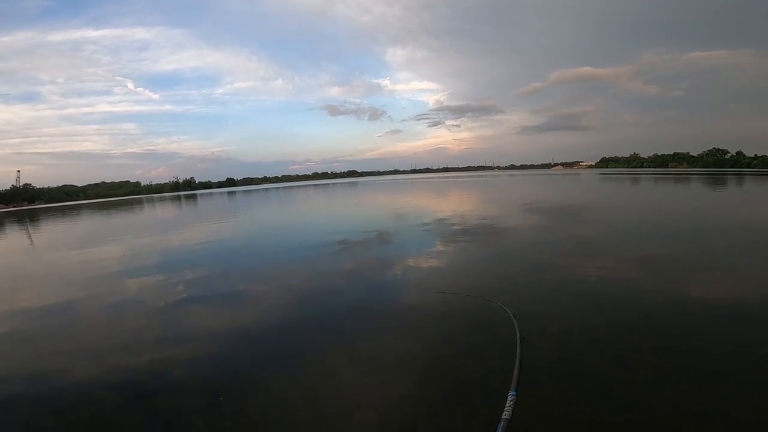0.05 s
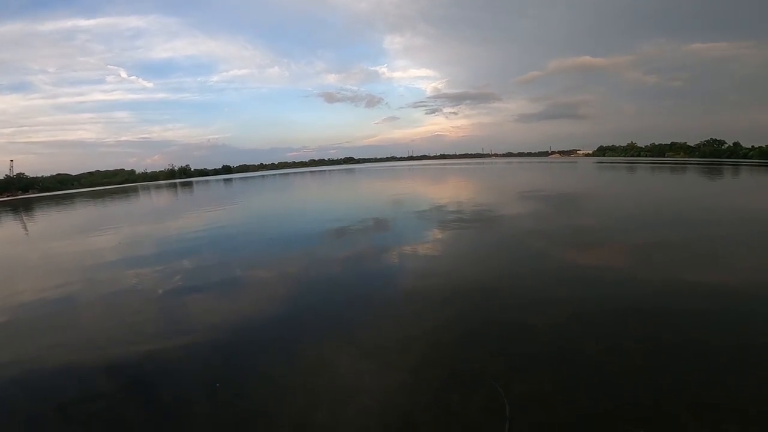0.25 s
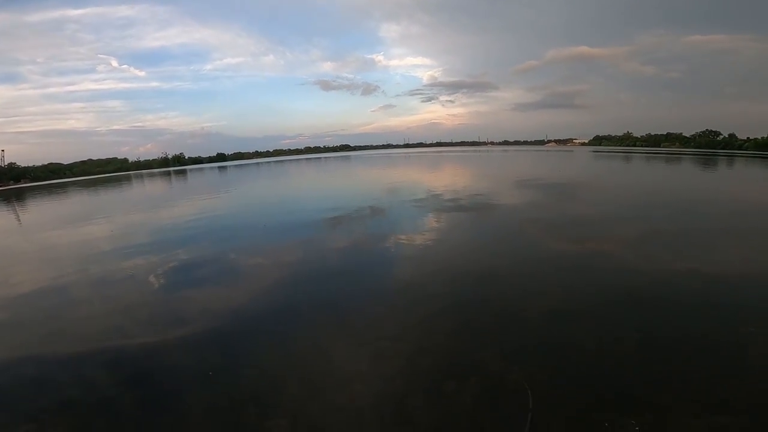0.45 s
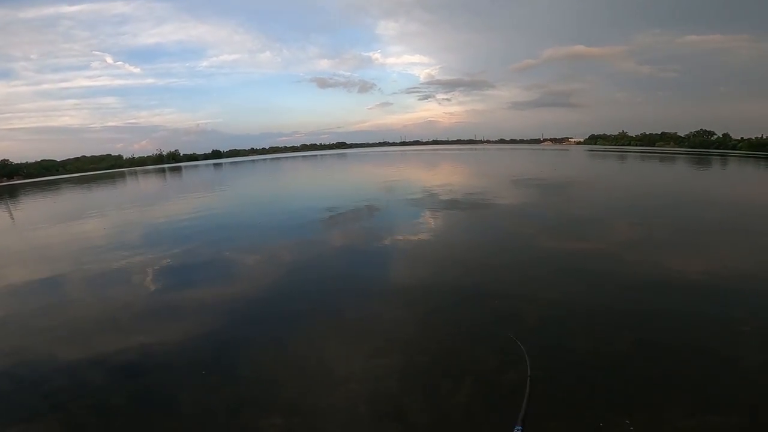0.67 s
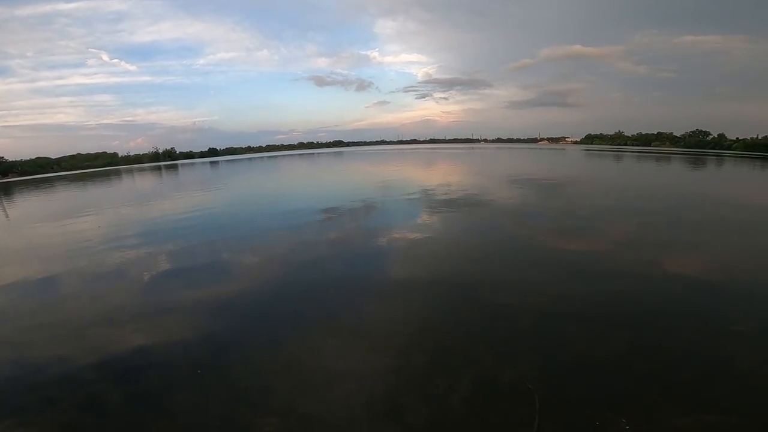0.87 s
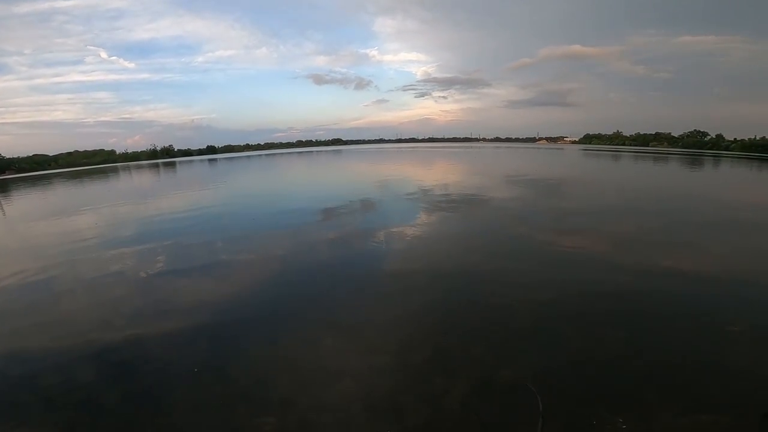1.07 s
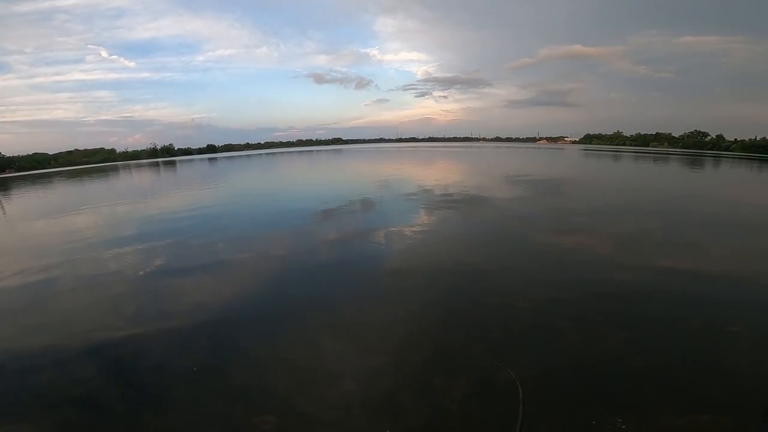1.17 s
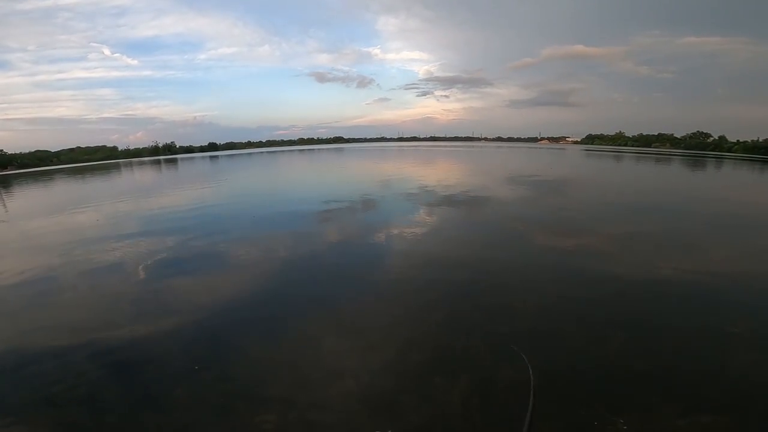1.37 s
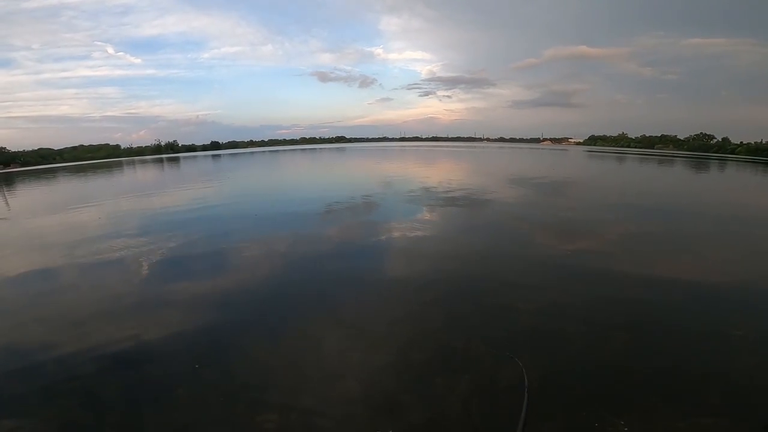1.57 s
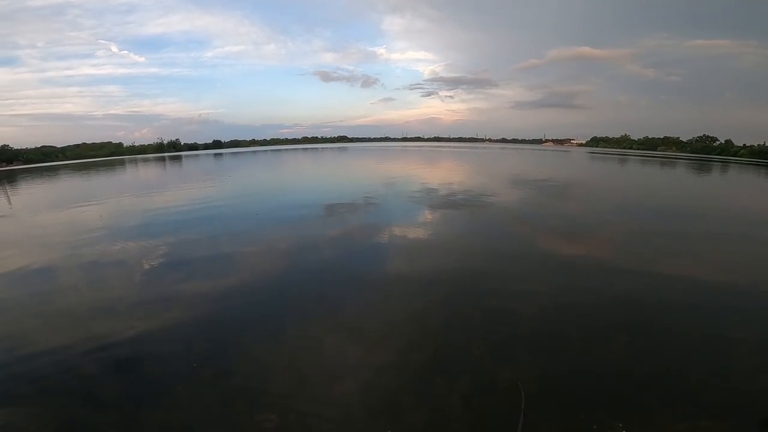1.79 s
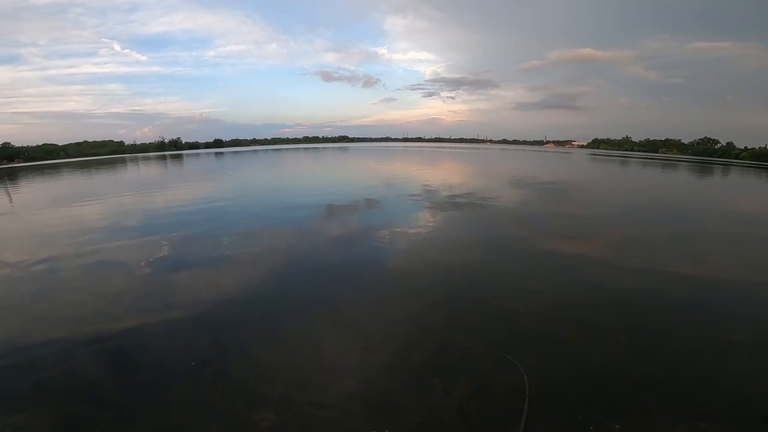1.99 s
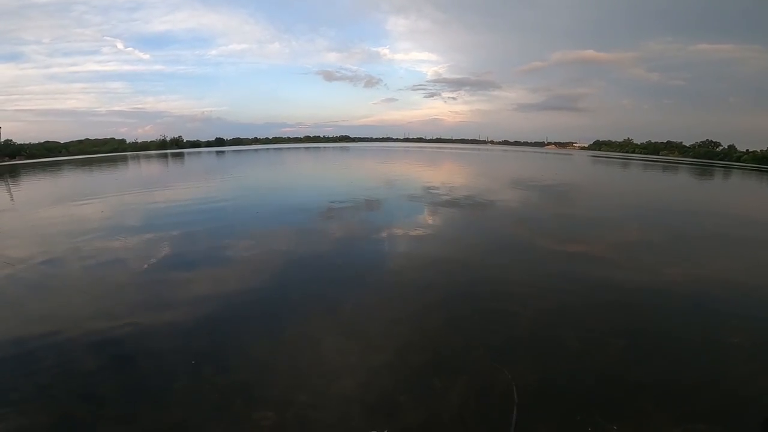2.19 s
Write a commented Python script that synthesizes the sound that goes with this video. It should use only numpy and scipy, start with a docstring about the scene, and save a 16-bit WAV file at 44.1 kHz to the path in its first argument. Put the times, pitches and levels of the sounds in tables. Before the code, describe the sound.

A fishing reel cranked close by, five dry knocks over uneven whirring, two dull bumps, faint splashes

```python
"""Fishing reel by a lake

A spinning reel is cranked against a hooked fish, close to a body-worn camera on a calm lake shore.
The gears whirr up and down with the handle: wavering tones plus rasping noise. Short pulses make five knocks.
Filtered pulses and fading noise make two soft bumps on the camera.
Small rising tones and noise make faint splashes, over a rumble of low noise."""
import sys
import numpy as np
from scipy import signal
from scipy.fft import rfft, irfft, next_fast_len
from scipy.io import wavfile
from scipy.ndimage import uniform_filter1d, map_coordinates

SR = 44100
rng = np.random.default_rng(int(sys.argv[2]) if len(sys.argv) > 2 else 0)


def log_audio(samples):
    """Write samples as a 16-bit WAV file to the path given in sys.argv[1]."""
    # one column per channel
    frames = np.atleast_2d(samples).T
    # limit to full scale, then quantise
    limited = np.clip(frames, -1, 1)
    pcm = np.round(limited * 32767).astype(np.int16)
    wavfile.write(sys.argv[1], SR, pcm)


N = 98607

# Every ..._COLOUR table is the tone colour of a sound: frequency_hz, level_db
# Tooth rate of the gears, slow and fast with each push on the handle: start_s, tooth_rate_hz
CRANK = [(0, 4900), (.025, 2400), (.075, 1600), (.115, 2350), (.155, 1950), (.198, 2950), (.225, 2350),
         (.275, 1830), (.315, 2750), (.337, 4900), (.352, 2600), (.373, 3600), (.392, 2300), (.465, 1630),
         (.508, 2950), (.54, 1600), (.575, 2150), (.625, 5400), (.648, 2400), (.715, 3350), (.765, 1650),
         (.8, 2750), (.822, 1850), (.885, 3300), (.915, 4750), (.945, 1600), (1.025, 3200), (1.055, 2750),
         (1.085, 1850), (1.16, 1550), (1.215, 2500), (1.26, 5500), (1.285, 2000), (1.32, 2200),
         (1.35, 3250), (1.385, 3200), (1.42, 1850), (1.505, 2080), (1.545, 2950), (1.583, 4450),
         (1.607, 1650), (1.682, 3300), (1.75, 1200), (1.79, 3050), (1.815, 1650), (1.862, 3000),
         (1.91, 3400), (1.937, 1700), (1.995, 2500), (2.045, 1680), (2.113, 2600), (2.152, 1500),
         (2.21, 2200), (2.236, 3400)]
# Tones of the whine: multiple (of an eighth of the tooth rate), level_db
GEAR_TONES = [(2, -10), (4, -5), (5, -8), (6, -4), (7, -12), (8, 0), (9.5, -11), (12, -13), (14, -15)]
# How strongly the reel housing passes each pitch of the whine: frequency_hz, level_db
HOUSING = [(400, -2.5), (1500, -2), (2400, 3.5), (3200, 1.5), (3800, 2), (4500, 1.5), (5200, 1.5),
           (6000, -4), (9000, -18), (15000, -48)]
# Loudness of the gears under the pull of the fish: start_s, level_db
LOAD = [(0, -42), (.45, -42.5), (.83, -40.5), (1.32, -39), (1.45, -41.5), (2.23, -37.5)]
RASP_COLOUR = [(200, -16.5), (600, -3), (1100, -1), (1600, 2.5), (2400, 0), (3100, -2), (4450, -4.5),
               (4900, -0.5), (5400, -10.5), (6200, -17), (9000, -36), (15000, -50)]
# Loudness of the high hiss: start_s, level_db
SPRAY = [(0, -59), (.2, -66.5), (.45, -67.5), (.6, -55.5), (.78, -58.5), (.87, -48.5), (1.1, -60),
         (1.33, -54), (1.48, -70), (1.65, -67), (1.851, -55), (2.1, -62), (2.23, -57)]
SPRAY_COLOUR = [(3000, 4.5), (6000, 11.5), (7500, 7), (10000, -2), (13000, -10.5), (15500, -46)]
# Splashes that swell and fade: middle_s, half_length_s, level_db
SPLASHES = [(.89, 0.018, -43), (.98, 0.052, -40.5), (1.73, 0.014, -39.5), (1.88, 0.062, -44.5),
            (2.05, 0.1, -51.5)]
SPLASH_COLOUR = [(150, 4), (400, -8), (900, -3.5), (1600, -7), (15000, -56)]
# Single plops of water: start_s, pitch_hz, level_db
PLOPS = [(.86, 370, -28), (.96, 655, -39), (.991, 670, -33), (1.008, 403, -31), (1.335, 255, -31),
         (1.738, 910, -31.5), (1.771, 290, -35), (1.795, 1430, -29.5), (1.858, 1090, -32.5),
         (1.875, 920, -27), (1.935, 452, -37), (2.066, 237, -35), (2.166, 920, -25.5)]
RUMBLE_COLOUR = [(15, -3), (32, -1), (60, -6), (120, -6), (190, -5.5), (300, -13.5), (500, -24),
                 (1200, -26.5), (5000, -59), (15000, -93)]
# Slow sways of the camera mount: middle_s, half_length_s, level_db
SWAYS = [(.03, 0.068, -38.5), (.37, 0.021, -34.5), (.67, 0.026, -33.5), (1.6, 0.019, -35)]
SWAY_COLOUR = [(12, 10), (33, -7), (55, 7.5), (120, -56), (1000, -100)]
# Pulses that make up the two bumps on the camera: start_s, level_db, shudder_level_db
BUMPS = [(.394, -21, -29.5), (.405, -13, -36), (0.4103, -7.5, -25.5), (0.468, -36, -28.5),
         (1.126, -44, -23), (1.137, -27, -32), (1.1427, -9, -33), (1.205, -24, -31.5)]
BUMP_COLOUR = [(20, -17.5), (55, -8.5), (85, 1.5), (120, 5.5), (155, -2.5), (200, -3), (255, -7),
               (315, -1.5), (450, -29), (700, -32), (3000, -100)]
SHUDDER_COLOUR = [(25, 2), (120, 1.5), (200, 2.5), (330, -2.5), (500, -9), (750, -20.5), (2000, -86)]
# Knocks of play in the reel: start_s, level_db, brightness_db_per_octave, whine_tail_level_db
KNOCKS = [(.3345, -10, 0, -30), (.622, -11, -.3, -38), (.9129, -10.5, .5, -35), (1.2027, -19.5, -2.5, -55),
          (1.5832, -10, -1, -41)]
KNOCK_COLOUR = [(200, -40), (450, -19), (750, -8), (1500, -.5), (2050, -6.5), (2400, -2.5), (2870, 4),
                (3500, -16), (4100, -11), (5500, -31), (9000, -37), (15000, -66)]
# Light ticks of the line: start_s, level_db
TICKS = [(.3795, -35), (.68, -40), (1.3135, -35), (1.978, -30.5)]
TICK_COLOUR = [(800, 2), (2500, -11), (4000, 12.5), (5300, 1), (6500, -7.5), (12000, -26), (16000, -48)]
# Stereo width of the noises once the image is fully open: frequency_hz, side_over_mid_db
WIDTH = [(100, -35.5), (350, -24.5), (700, -17.5), (2800, -14.5), (5500, -3.5), (10000, -0.5), (14000, 5)]
# Level of the stereo difference over time: start_s, level_db
OPENING = [(0, -33), (.82, -37), (.96, -14.5), (1.85, -0.5)]
# Share of the middle that leans to the left: frequency_hz, level_db
LEAN = [(100, -55), (600, -16), (2000, -30), (3200, -18)]

# A T60 is the time in seconds to fade by 60 dB
MID_SPEED_HZ = 2500  # tooth rate from which octaves of speed are counted
JITTER, FLUTTER_DB = .028, 5  # random wavering in pitch (share) and level
WHINE_DB, WHINE_GROWS_DB = -4, 4  # level over the load, growth per octave of speed
RASP_DB, RASP_GROWS_DB, RASP_GRAIN_DB = -2, 2.5, 2.5  # the same for the rasp, and its roughness
RASP_BRIGHTENS_DB, RASP_TREBLE_HZ = 1, 3700  # extra treble gain per octave of speed
SLACK_DB, SLACK_OCT_PER_S = 10, 120  # the teeth fully unload when slowing this fast
BUBBLE_HZ, BUBBLE_CYCLES, BUBBLE_DB = 698, 2.03, -1.5  # middle pitch, life in cycles, level
CRACKLE_HZ, CRACKLE_CYCLES, CRACKLE_DB = 1100, .8, 1  # the same for the droplets
BUBBLE_SPREAD, BUBBLE_RISE = 0.607, 0.011  # random spread of pitch (log scale), upward bend
WASH_DB, RUMBLE_DB = -3.5, -41
SHUDDER_T60, BUMP_TOP_HZ = 0.38, 1100
SMEAR_HZ, SMEAR_WIDTH_HZ = 2030, 2200  # the rod delays this band of each knock
REBOUND_S, REBOUND_DB = .004, -20  # delay and level after the knock
RATTLE_DB, RATTLE_T60 = -15, 0.025
CLATTER_DB, CLATTER_S = -26, 0.0085  # loose parts chatter just before and after each knock
TAIL_HZ, TAIL_T60 = 4490, 0.05  # high tone that fades after each knock
TICK_T60 = 0.059
TOP_HZ = 15400  # the camera keeps nothing above this


def amp(db):
    """Turn decibels into a gain."""
    return 10 ** (np.asarray(db) / 20)


def unit(x):
    """Scale a sound to an average (rms) strength of 1."""
    return x / np.sqrt(np.mean(x ** 2) + 1e-20)


def clock():
    """Give the time of every sample in seconds."""
    return np.arange(N) / SR


def over_time(points):
    """Join (time, value) points with straight lines."""
    return np.interp(clock(), *np.transpose(points))


def along(points, hz):
    """Join (frequency, value) points on a logarithmic frequency axis."""
    f, v = np.transpose(points)
    return np.interp(np.log(hz + 1), np.log(f + 1), v)


def wobble(rate):
    """Draw a smooth random curve through this many random points a second."""
    knots = rng.standard_normal(int(N * rate / SR) + 4)
    return map_coordinates(knots, [clock() * rate])


def filtered(x, response):
    """Multiply each frequency of a sound by a response."""
    size = next_fast_len(N + SR // 2)
    gains = response(np.fft.rfftfreq(size, 1 / SR))
    return irfft(rfft(x, size) * gains, size)[..., :N]


def noise(colour):
    """Make coloured stereo noise of rms 1, wider in the treble."""
    def response(hz):
        return amp(along(colour, hz)) * np.array([np.ones_like(hz), amp(along(WIDTH, hz))])

    mid, side = filtered(rng.standard_normal((2, N)), response)
    return unit(np.array([mid + side, mid - side]))


def blow(colour, size=8192):
    """Make a pulse of this colour and peak 1 that starts as promptly as it can (minimum phase)."""
    cepstrum = irfft(np.log(amp(along(colour, np.fft.rfftfreq(size, 1 / SR)))))
    # folding the second half onto the first moves all the sound after the start
    cepstrum[1:size // 2] *= 2
    cepstrum[size // 2 + 1:] = 0
    pulse = irfft(np.exp(rfft(cepstrum)))[:size // 2]
    return pulse / np.abs(pulse).max()


def struck(hits, pulse):
    """Place the pulse at every (time, level)."""
    train = np.zeros(N)
    for s, db in hits:
        train[round(s * SR)] += amp(db)
    return signal.fftconvolve(train, pulse)[:N]


def decays(hits, t60):
    """Make a loudness curve that jumps at every (time, level) and dies away."""
    t = clock()
    power = sum((t >= s) * amp(db - 60 * np.abs(t - s) / t60) ** 2 for s, db in hits)
    return np.sqrt(power)


def swells(rows):
    """Make a loudness curve of bell-shaped rises (middle, half length, level)."""
    return sum(amp(db) * np.exp(-.5 * ((clock() - s) / half) ** 2) for s, half, db in rows)


def tooth_rate():
    """The handle speeds up and slows with each push; the rotor's inertia rounds the turns."""
    return uniform_filter1d(over_time(CRANK), size=500)


def gear_whine(hz):
    """Meshing teeth sound wavering tones tied to the tooth rate, shaped by the housing."""
    whine = np.zeros(N)
    for eighths, db in GEAR_TONES:
        pitch = eighths / 8 * hz
        phase = 2 * np.pi * np.cumsum(pitch * (1 + JITTER * wobble(1500))) / SR
        level = db + along(HOUSING, pitch) + FLUTTER_DB * np.minimum(wobble(130), 1)
        whine += amp(level) * np.sin(phase)
    # all the tones also waver together, slowly and quickly
    return whine * amp(2.5 * np.minimum(wobble(45), 1.2) + 2.5 * np.minimum(wobble(600), 1))


def gear_rasp(octaves):
    """The teeth rasp as grainy noise whose treble grows with speed."""
    rasp = unit(noise(RASP_COLOUR) * amp(RASP_GRAIN_DB * wobble(500)))
    treble = filtered(rasp, lambda f: 1 - 1 / (1 + (f / RASP_TREBLE_HZ) ** 8))
    return rasp + (amp(RASP_BRIGHTENS_DB * octaves) - 1) * treble


def gears():
    """Whine and rasp grow with load and speed; the whine softens as the handle slows."""
    hz = tooth_rate()
    octaves = np.log2(hz / MID_SPEED_HZ)
    slack = np.clip(-np.gradient(octaves) * SR / SLACK_OCT_PER_S, 0, 1)
    whine = amp(WHINE_DB + WHINE_GROWS_DB * octaves - SLACK_DB * slack) * gear_whine(hz)
    rasp = amp(RASP_DB + RASP_GROWS_DB * octaves) * gear_rasp(octaves)
    return amp(over_time(LOAD)) * (whine + rasp)


def bubbles(rows, cycles):
    """Each bubble (time, pitch, level) rings for a few cycles and rises in pitch."""
    out, t = np.zeros(N + SR), np.arange(SR // 10) / SR
    for s, hz, db in rows:
        age = hz * t / cycles
        envelope = 2 * amp(db) * np.sqrt(age) * np.exp(-age)
        tone = np.sin(2 * np.pi * hz * t * (1 + BUBBLE_RISE * age))
        out[int(s * SR):][:len(t)] += envelope * tone
    return out[:N]


def swarm(hz, cycles, count):
    """Many bubbles of random time, pitch and level mix into a sound of rms 1."""
    times = rng.uniform(0, N / SR, count)
    draws = rng.standard_normal((count, 2))
    rows = [(s, hz * np.exp(BUBBLE_SPREAD * pitch), 3 * size) for s, (pitch, size) in zip(times, draws)]
    return unit(bubbles(rows, cycles))


def water():
    """Bubbles and crackling droplets splash on a wash of noise, with single plops and a high hiss."""
    hiss = amp(over_time(SPRAY) + 2.2 * wobble(140)) * noise(SPRAY_COLOUR)
    bubbling = amp(BUBBLE_DB) * swarm(BUBBLE_HZ, BUBBLE_CYCLES, count=160)
    droplets = amp(CRACKLE_DB) * swarm(CRACKLE_HZ, CRACKLE_CYCLES, count=380)
    wash = amp(WASH_DB) * noise(SPLASH_COLOUR)
    return hiss + swells(SPLASHES) * (bubbling + droplets + wash) + bubbles(PLOPS, BUBBLE_CYCLES)


def rumble():
    """A low outdoor rumble of noise drifts slightly in level."""
    return amp(RUMBLE_DB + 1.1 * wobble(10.3)) * noise(RUMBLE_COLOUR)


def handling():
    """The camera mount sways slowly and takes dull bumps, each with a fading shudder."""
    sway = swells(SWAYS) * noise(SWAY_COLOUR)
    thud = struck([(s, db) for s, db, _ in BUMPS], -blow(BUMP_COLOUR))
    fading = uniform_filter1d(decays([(s, db) for s, _, db in BUMPS], SHUDDER_T60), size=600)
    shudder = fading * noise(SHUDDER_COLOUR)
    lowpass = signal.butter(2, BUMP_TOP_HZ, fs=SR, output="sos")
    return signal.sosfilt(lowpass, thud + shudder + sway)


def knock(s, db, tilt_db):
    """One dry knock has its own brightness, a rebound, and a brief rattle and clatter."""
    colour = [(hz, level + tilt_db * np.log2(hz / SMEAR_HZ)) for hz, level in KNOCK_COLOUR]

    def rod_delay(hz):
        # an all-pass filter: it delays a band but leaves its strength alone
        pole = SMEAR_HZ ** 2 - hz ** 2 + 1j * hz * SMEAR_WIDTH_HZ
        return np.conj(pole) / pole

    pulse = filtered(blow(colour), rod_delay)
    hits = [(s, db), (s + REBOUND_S, db + REBOUND_DB + rng.normal(0, 2))]
    clatter = swells([(s, CLATTER_S, db + CLATTER_DB)]) * amp(FLUTTER_DB * wobble(600))
    rattle = amp(RATTLE_DB) * decays([(s, db)], RATTLE_T60)
    return struck(hits, pulse / np.abs(pulse).max()) + (rattle + clatter) * noise(colour)


def whine_tail():
    """A short wavering high tone fades after each knock, probably the whine at its peak."""
    phase = 2 * np.pi * np.cumsum(TAIL_HZ * (1 + JITTER * wobble(1500))) / SR
    return decays([(s, tail_db) for s, _, _, tail_db in KNOCKS], TAIL_T60) * np.sin(phase)


def line_ticks():
    """The line ticks lightly: short bursts of noise that die away."""
    return uniform_filter1d(decays(TICKS, TICK_T60), size=80) * noise(TICK_COLOUR)


def knocks():
    """Play in the reel closes with knocks, each trailed by a short high tone; the line ticks."""
    dry_knocks = sum(knock(s, db, tilt_db) for s, db, tilt_db, _ in KNOCKS)
    return dry_knocks + whine_tail() + line_ticks()


def scene():
    """Add the reel, the lake, the rumble and the touches on the camera."""
    return gears() + water() + rumble() + handling() + knocks()


def record(dry):
    """The image opens from nearly mono to narrow stereo, and the camera cuts the highest treble."""
    mid, side = (dry[0] + dry[1]) / 2, (dry[0] - dry[1]) / 2
    leaning = filtered(mid, lambda hz: amp(along(LEAN, hz)))
    side = (side + leaning) * amp(over_time(OPENING))
    return filtered(np.array([mid + side, mid - side]), lambda hz: hz < TOP_HZ)


dry = scene()
out = record(dry)
log_audio(out)
```